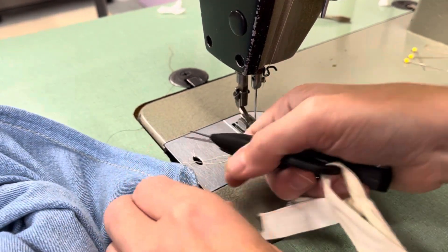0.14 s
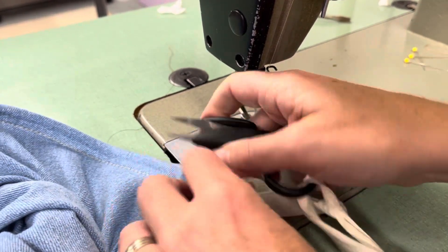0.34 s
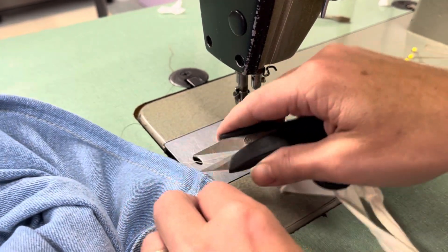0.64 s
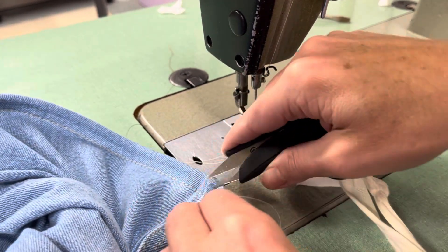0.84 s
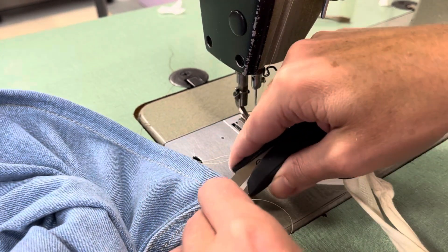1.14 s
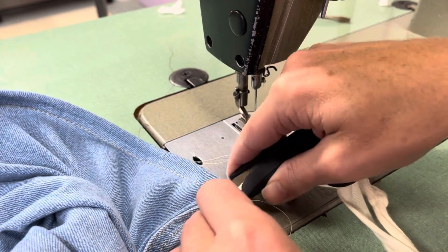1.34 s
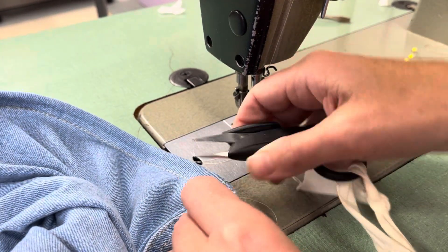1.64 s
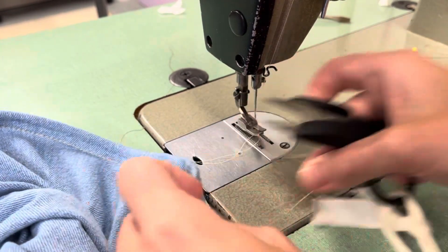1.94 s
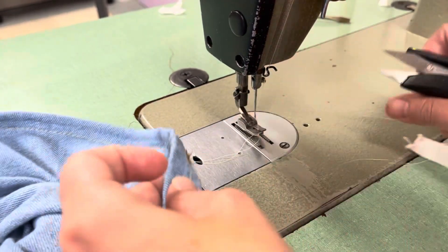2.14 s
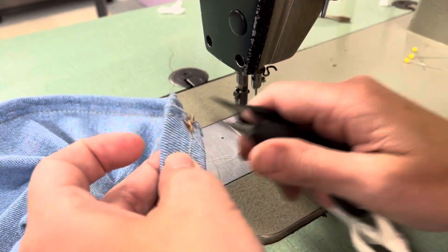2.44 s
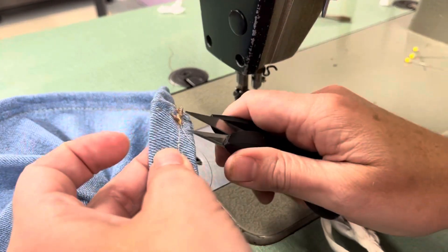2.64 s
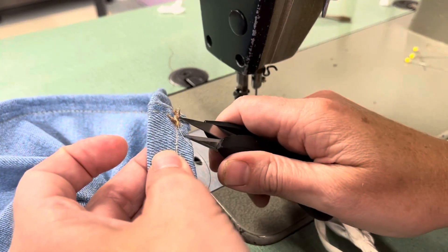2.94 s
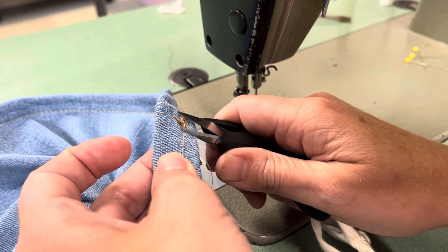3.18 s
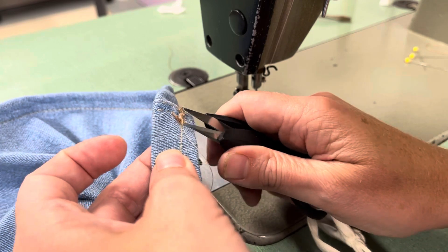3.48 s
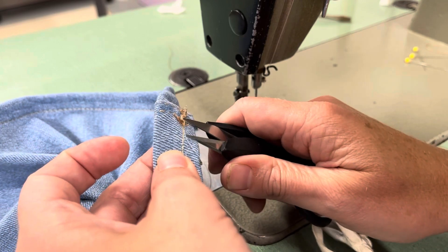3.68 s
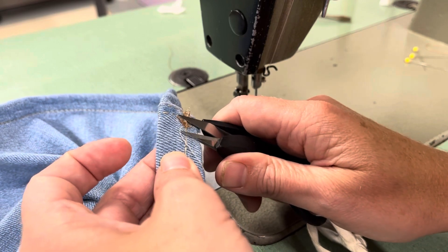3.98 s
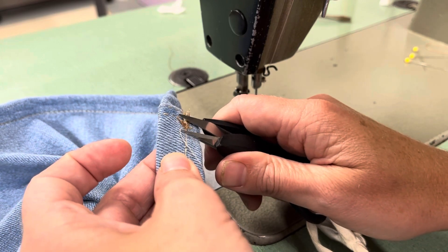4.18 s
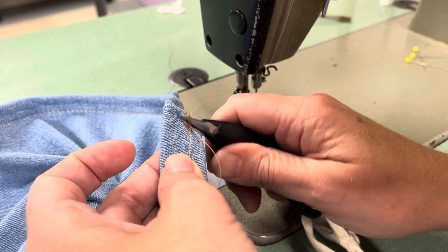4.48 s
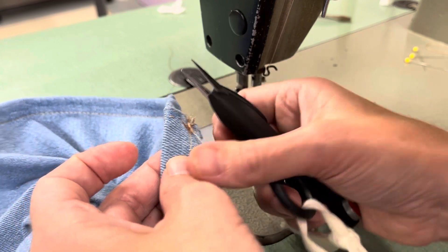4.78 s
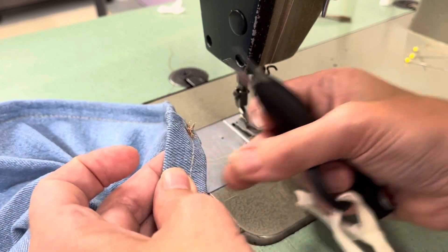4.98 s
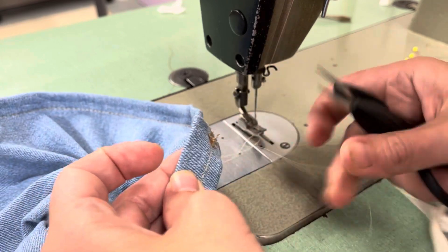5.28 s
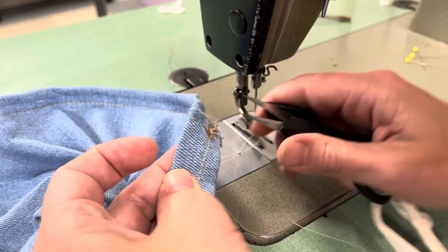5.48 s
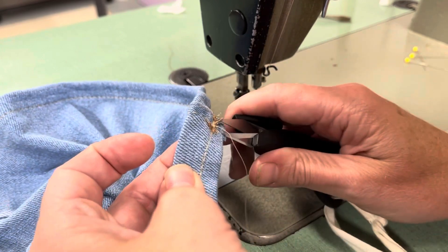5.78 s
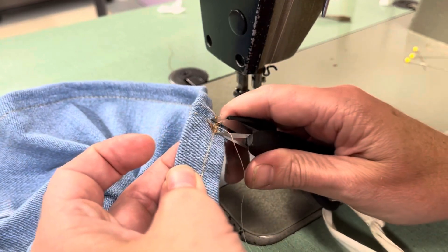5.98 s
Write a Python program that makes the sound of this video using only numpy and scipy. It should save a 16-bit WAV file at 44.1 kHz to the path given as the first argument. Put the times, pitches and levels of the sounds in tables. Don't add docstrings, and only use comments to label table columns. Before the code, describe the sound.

A sewing machine motor idles with a low, slowly pulsing hum and airy whir, while small thread snips scrape and click sharply four times.

```python
import sys
import numpy as np
from scipy import signal
from scipy.fft import rfft, irfft, next_fast_len
from scipy.io import wavfile

SR = 44100
rng = np.random.default_rng(int(sys.argv[2]) if len(sys.argv) > 2 else 0)


def volts(x):
    e = np.asarray(x, float) / 20
    return 10 ** e


def wrap_up_sound(samples):
    columns = np.atleast_2d(samples).T
    tamed = np.clip(columns, -1, 1)
    steps = np.round(tamed * 32767).astype(np.int16)
    wavfile.write(sys.argv[1], SR, steps)


N = 269953
T = np.arange(N) / SR
SIZE = next_fast_len(N + SR // 2)
HZ = np.arange(SIZE // 2 + 1) * SR / SIZE

MAINS_HZ, FAN_HZ = 59.92, 158.46
SLIP_HZ, IN_STEP_S = 1.036, -0.022
FIELD_DB, ROTOR_DB, SIXTH_DB = -24.2, -28.5, -44
PULSE_LEAD = 1.35
HUM_PAN = [
    0,
    -3,
    2.5,
    -2.5,
    -4,
]
# slips_above_field, level_db, lead_rad
ROTOR_WOBBLE = [(-3, -57, -1.15), (-2, -57, .96), (1, -52.5, -.93), (2, -50, .38), (3, -59, 2.2),
                (4, -58, -1.4)]
# level_db, neighbour_share (0 to 1), beat_s, weakest_s
SLOW_BEATS = [
    (-35, 0.67, 5.8, 3.45),
    (-33, 0.59, 5.75, 3.65),
    (-37, 0.35, 6.7, 1.02),
]
# pitch_hz, then level_db, pan_db
BUZZ_HZ = [k * MAINS_HZ for k in (4, 5, 7, 8, 9, 10, 11, 12, 18, 23, 24)]
BUZZ_LEVELS = [(-45, -4), (-47, 3), (-51, -12), (-52.5, -20), (-57, -20), (-44, -10.5), (-56.5, -5),
               (-61, -14), (-63.5, -18), (-64, 5), (-62.5, 0)]
WHINE_PITCHES = [201, 218.4, 261, 600.1, 633.7, 660.3, 705.5, 720.2, 1388]
# level_db, pan_db
WHINE_LEVELS = [(-56.5, -1), (-53, -4), (-50, -3), (-50.5, -5), (-54.5, 0), (-58.5, 3), (-64.5, -3),
                (-57.5, 14), (-69, 2)]

PANEL_HZ, PANEL_WIDTH_HZ, PANEL_DB, PANEL_PAN_DB = 358.2, 44, -37.5, -5.5
SURGE_S, SURGE_SPREAD_HZ = 0.03, 6.0
# time_s, level_db
PANEL_SURGES = [(.107, -31), (.496, -29), (.862, -30), (.957, -32.5), (1.203, -32.5), (1.333, -35),
                (1.72, -31), (1.896, -33.5), (2.368, -30.5), (2.854, -32), (2.977, -33.5), (3.314, -34.5),
                (3.454, -33), (4.05, -28.5), (4.14, -33.5), (4.426, -27), (4.978, -30), (5.314, -35),
                (5.467, -27), (5.65, -31.5), (5.894, -30.5)]

# pitch_hz, level_db (per Hz)
RUSH_COLOUR = [(25, -81), (60, -67.5), (200, -67.5), (330, -62.5), (520, -67), (800, -78.5), (2000, -84),
               (3500, -92), (5300, -95), (6700, -103), (8000, -96), (10300, -99), (13400, -128),
               (15200, -103)]
# pitch_hz, level_db, share_following_sum (0 to 1), phase_rad
RUSH_WIDTH = [(60, -14, .3, 3.8), (300, -7, .7, 4.34), (480, 0.5, .65, 3.65), (750, 0, 0.37, 2.9),
              (1300, 0.5, 0.4, 3.8), (2000, -1, 0.3, 3.4), (2500, -5.5, 0.57, 3.1), (5000, 0, .8, 2.8),
              (7300, 4.5, 0.8, 5), (8200, -20, .3, 3.1), (9900, -14, .3, 2), (10570, 0, .4, 1.6),
              (13400, 21.5, .3, 1.6), (15000, -18, 0, 1.6)]
# pitch_hz, width_hz, lift_db
TABLE_RINGS = [(238, 7, 9), (304, 26, 7), (354, 55, 1), (403.6, 73, 6.5), (758, 76, 2), (1062, 30, 7.5),
               (1380, 140, 1), (1608, 26, 5), (1913, 59, 2), (2460, 48, 6), (2660, 45, 5), (2870, 18, 5),
               (3170, 10.6, 13.5), (3380, 17, 6.5), (3890, 72, 7.5), (4150, 31, 11.5), (4480, 16, 12.5),
               (4740, 22, 5.5), (4980, 50, 8), (5900, 45, 6.5)]

# start_s, closing_s, level_db (at closing), growth_db, low_ring_db
SCRAPES = [
    (1.363, 1.379, -32.5, 11, -0.5),
    (1.585, 1.609, -26, 9, -3.5),
    (4.374, 4.386, -46, -3, -4),
    (4.412, 4.4295, -39.5, 6, -12),
    (4.6114, 4.628, -29.5, 11, -9),
    (4.629, 4.639, -25.5, -3, 4),
    (2.05, 2.082, -57, 2, -20),
    (4.784, 4.9, -58, 0, -20),
]
# time_s, peak_db, lowest_hz, highest_hz
SNIP_TICKS = [(1.3762, -7, 6960, 11000), (1.3757, -9, 2400, 6500), (1.376, -16, 14000, 15800),
              (1.6065, -7.5, 2400, 13100), (1.6061, -5, 2100, 2900), (2.981, -30, 7000, 10500),
              (4.3322, -42, 4000, 12000), (4.4276, -10, 4500, 15500), (4.4276, -5, 1600, 4460),
              (4.634, -5, 2450, 3100), (4.637, -7, 2400, 13000), (4.635, -9, 14000, 15800),
              (1.604, -10, 14000, 15800)]
# time_s, peak_db, pitch_hz, half_length_ms
BLADE_SQUEAKS = [(1.5925, -31, 5240, 1.), (1.596, -13.5, 4830, 1.14), (1.6058, -20.5, 4900, 1.2),
                 (4.378, -36, 4900, 1.6), (4.376, -37, 3900, 0.86), (4.383, -43, 4400, 1.5),
                 (4.6282, -13, 4900, 0.52), (4.6265, -29.5, 5500, 1.3), (1.6005, -33, 3400, 0.85)]
# pitch_hz, width_hz, level_db
BLADE_RINGS = [(2700, 1300, 2), (4960, 490, 0), (7500, 1800, -4), (8930, 2400, -4), (11400, 1100, -5.5),
               (15200, 1500, -15)]
# pitch_hz, pan_db
PORT_BALANCE = [(60, 0.0), (110, 0.5), (200, -2.0), (380, -2.5), (700, 2), (1290, -3.5), (2380, -6),
                (4400, -9), (8120, 2), (15000, 1.5)]
# pitch_hz, lead_rad
PORT_LEAD = [(0, 0), (430, -0.6), (1720, 3), (3100, -2), (3790, 2), (4910, -0.5), (5680, 5), (6290, 1),
             (7750, 8), (9650, 4), (12000, 11), (13600, 7.5), (15000, 13), (16000, 11)]
PORT_DIP_HZ, PORT_DIP_WIDTH_HZ, PORT_DIP = 13200, 900, 0.75
ROOM_DB, ROOM_T60_S = -14.5, 0.2


def over_hz(table, col=1):
    table = np.array(table, float)
    return np.interp(np.log(HZ + 1), np.log(table[:, 0] + 1), table[:, col])


def shape(x, gain):
    return irfft(rfft(x, SIZE) * gain, SIZE)[..., :N]


def ring(hz, width):
    return 1 / (1 + 1j * (HZ ** 2 - hz ** 2) / (width * HZ + 1e-9))


def walk(rate):
    knots = rng.standard_normal(int(N / SR * rate) + 4)
    return 1.53 * np.interp(T * rate, np.arange(len(knots)), knots)


def around(s, before, after):
    part = slice(int((s - before) * SR), int((s + after) * SR))
    return part, T[part] - s


def place(wave, pan_db):
    sides = volts(np.array([[pan_db], [-pan_db]]) / 2)
    return wave * sides / sides.mean()


def tone(hz, db, pan_db, phase):
    return place(np.sqrt(2) * volts(db) * np.cos(2 * np.pi * hz * T + phase), pan_db)


def beating(hz, pan_db, phase, db, share, beat_s, weakest_s):
    against = phase + np.pi - 2 * np.pi * weakest_s / beat_s
    neighbour = tone(hz + 1 / beat_s, db, pan_db, against)
    return tone(hz, db, pan_db, phase) + np.clip(share, 0, 1) * neighbour


def hum():
    field_pan, rotor_pan, second_pan, third_pan, fan_pan = HUM_PAN
    second, third, fan = SLOW_BEATS
    slip_turn = 2 * np.pi * SLIP_HZ * IN_STEP_S
    out = tone(MAINS_HZ, FIELD_DB, field_pan, 0)
    out += tone(MAINS_HZ - SLIP_HZ, ROTOR_DB + 0.3 * walk(2), rotor_pan, slip_turn)
    for k, db, lead in ROTOR_WOBBLE:
        out += tone(MAINS_HZ + k * SLIP_HZ, db, -2, lead - k * slip_turn)
    out += beating(2 * MAINS_HZ, second_pan, PULSE_LEAD, *second) * volts(0.73 * walk(4.5))
    out += beating(3 * MAINS_HZ, third_pan, 2 * PULSE_LEAD, *third) * volts(0.18 * walk(3.8))
    out += beating(FAN_HZ, fan_pan, 0, *fan) * volts(0.3 * walk(4))
    for hz, (db, pan_db) in zip(BUZZ_HZ + WHINE_PITCHES, BUZZ_LEVELS + WHINE_LEVELS):
        out += tone(hz, db + 0.6 * walk(3), pan_db, 2 * np.pi * rng.random())
    return out


def rush(low_db=1.05, high_db=0.39):
    lift_power = 1
    for hz, width, db in TABLE_RINGS:
        lift_power = lift_power + volts(2 * db) * np.abs(ring(hz, width)) ** 4
    colour = volts(over_hz(RUSH_COLOUR)) * np.sqrt(lift_power) * np.sqrt(SR / 2)
    flutter = volts(np.array([low_db * walk(8.2), high_db * walk(9.2)]))
    low_part, high_part = rng.standard_normal((2, 2, N)) * flutter[:, None, :]
    low = 1 / (1 + (HZ / 900) ** 4)
    noise = rfft(low_part, SIZE) * np.sqrt(low) + rfft(high_part, SIZE) * np.sqrt(1 - low)
    share = np.clip(over_hz(RUSH_WIDTH, col=2), 0, 1)
    follows = share * np.exp(1j * over_hz(RUSH_WIDTH, col=3))
    side = volts(over_hz(RUSH_WIDTH)) * (follows * noise[0] + np.sqrt(1 - share ** 2) * noise[1])
    return irfft(colour * np.array([noise[0] + side, noise[0] - side]), SIZE)[:, :N]


def loose_panel():
    rumble = shape(rng.standard_normal(N), ring(PANEL_HZ, PANEL_WIDTH_HZ) ** 2)
    lumps = volts(PANEL_DB) * rumble / rumble.std()
    sixth = 2 * np.pi * 6 * MAINS_HZ * T
    for s, db in PANEL_SURGES:
        part, t = around(s, 3 * SURGE_S, 3 * SURGE_S)
        swell = np.sqrt(2) * volts(db) * np.exp(-(t / SURGE_S) ** 2)
        off_hz = SURGE_SPREAD_HZ * rng.standard_normal()
        lumps[part] += swell * np.cos(sixth[part] + 2 * np.pi * off_hz * t)
    return place(lumps, PANEL_PAN_DB) + tone(6 * MAINS_HZ, SIXTH_DB + 0.5 * walk(3), -4, 0)


def scrapes(white, grit_db=3.5):
    grit = white * volts(grit_db * walk(1500))
    bright, low = np.zeros((2, N))
    for start, close, db, growth_db, low_db in SCRAPES:
        part, t = around(close, close - start, 0.01)
        progress = np.minimum(t, 0) / (close - start)
        press = volts(db + growth_db * progress) * np.clip((t - t[0]) / 0.003, 0, 1)
        press *= np.exp(-np.maximum(t, 0) / 0.00052)
        bright[part] += grit[part] * press
        low[part] += grit[part] * press * volts(low_db + 5.5 * progress)
    modes = [(-1) ** k * volts(db) * ring(hz, width) for k, (hz, width, db) in enumerate(BLADE_RINGS)]
    thin = 1 / (1 + (2400 / (HZ + 1)) ** 10)
    return volts(5) * (shape(low, thin * modes[0] ** 2) + shape(bright, thin * sum(modes[1:])))


def ticks(white):
    out = np.zeros(N)
    for s, db, low_hz, high_hz in SNIP_TICKS:
        part, t = around(s, 0, 0.006)
        tick = volts(db) * (0.4 * white[part] * np.exp(-t / 0.00025) + (t == t[0]))
        band = signal.butter(N=2, Wn=[low_hz, high_hz], btype="band", fs=SR, output="sos")
        out[part] += signal.sosfilt(band, tick)
    return out


def squeaks():
    out = np.zeros(N)
    for s, db, hz, half_ms in BLADE_SQUEAKS:
        part, t = around(s, 0.006, 0.006)
        out[part] += volts(db) * np.exp(-(t * 1000 / half_ms) ** 2) * np.cos(2 * np.pi * hz * t)
    return out


def phone_ports():
    tilt = volts(over_hz(PORT_BALANCE) / 2) * np.exp(0.5j * over_hz(PORT_LEAD))
    ports = np.array([tilt, 1 / tilt]) / np.maximum(np.abs(tilt + 1 / tilt) / 2, 0.6) + 0.092
    dip = np.clip(PORT_DIP, 0, 1) * np.abs(ring(PORT_DIP_HZ, PORT_DIP_WIDTH_HZ)) ** 2
    return ports - ports.mean(axis=0) * dip


def room():
    t = T[:SR // 3]
    tail = rng.standard_normal((2, len(t))) * np.exp(-np.log(1000) * t / ROOM_T60_S) * (t > 0.002)
    tail *= volts(ROOM_DB) / np.sqrt(np.sum(tail ** 2, axis=1, keepdims=True))
    return rfft(tail, SIZE) / np.sqrt(1 + (HZ / 6500) ** 6)


def snips():
    white = rng.standard_normal(N)
    broad, squeak = scrapes(white) + ticks(white), squeaks()
    ports, tail = phone_ports(), room()
    echoes = shape(broad + 0.22 * squeak, 1.2 * ports * tail[0] + 0.5 * tail)
    return shape(broad + squeak, ports) + echoes


def scene():
    return hum() + rush() + loose_panel() + snips()


def band_limit(x):
    return signal.sosfilt(signal.butter(12, 16440, fs=SR, output="sos"), x)


def record(dry):
    top_cut = signal.ellip(8, 0.2, 45, 15900, fs=SR, output="sos")
    return band_limit(signal.sosfilt(top_cut, dry))


dry = scene()
out = record(dry)
wrap_up_sound(out)
```